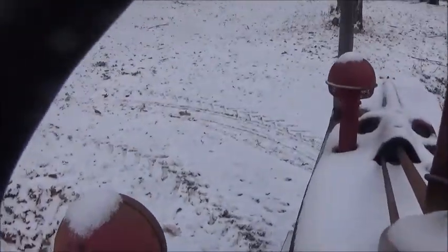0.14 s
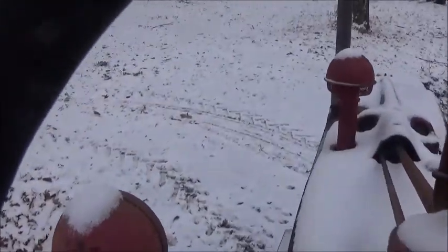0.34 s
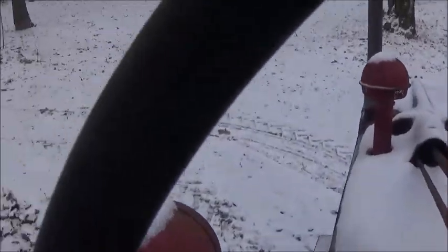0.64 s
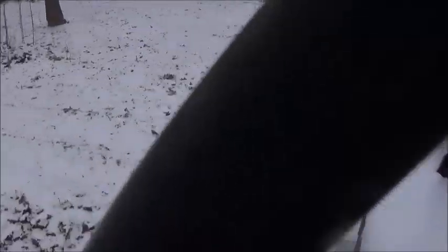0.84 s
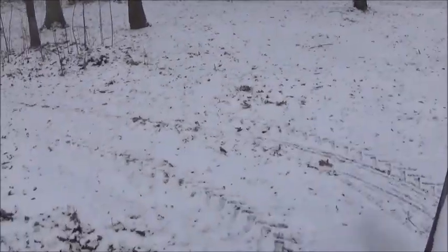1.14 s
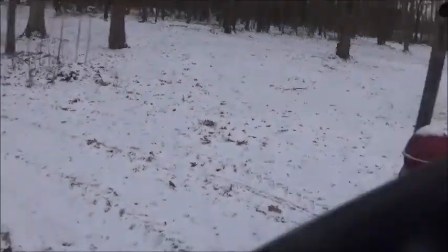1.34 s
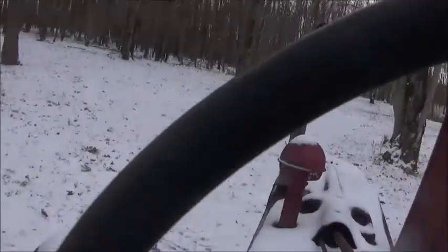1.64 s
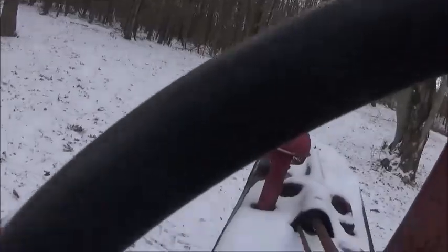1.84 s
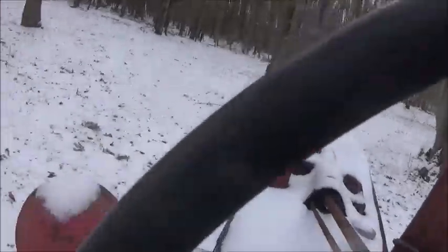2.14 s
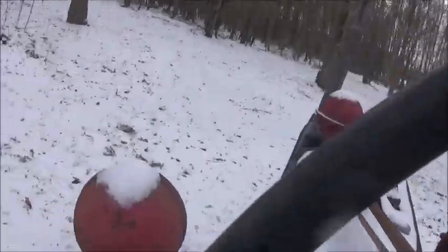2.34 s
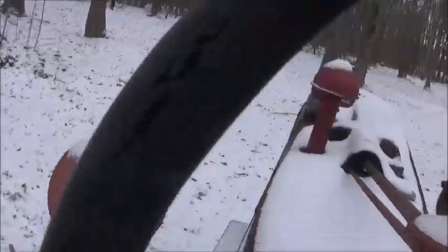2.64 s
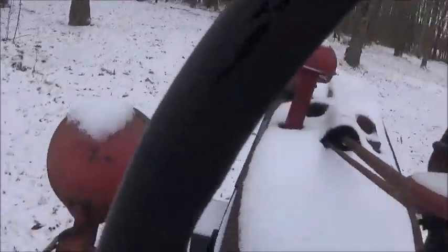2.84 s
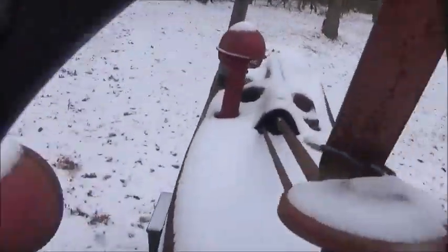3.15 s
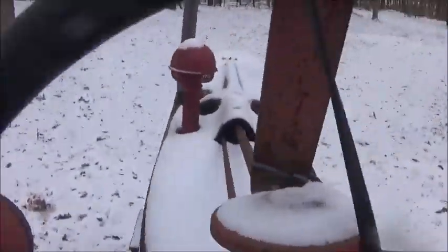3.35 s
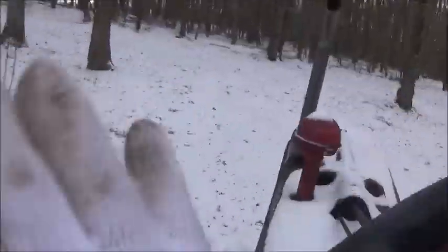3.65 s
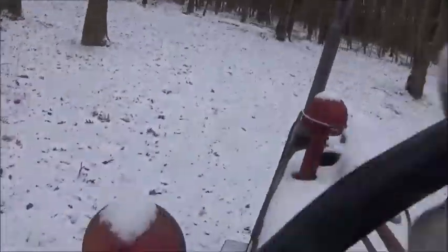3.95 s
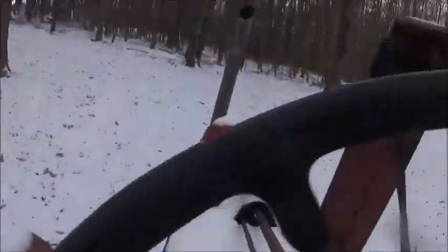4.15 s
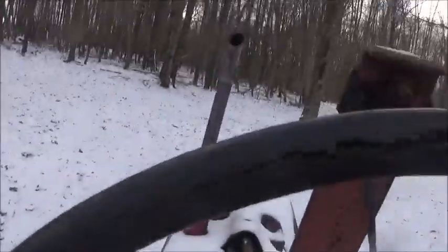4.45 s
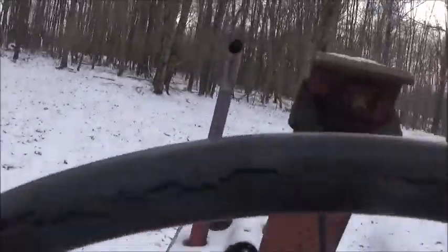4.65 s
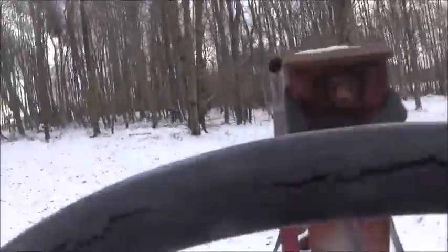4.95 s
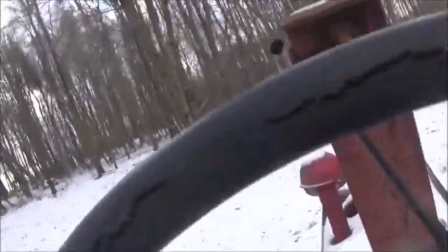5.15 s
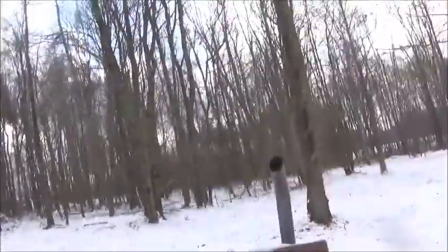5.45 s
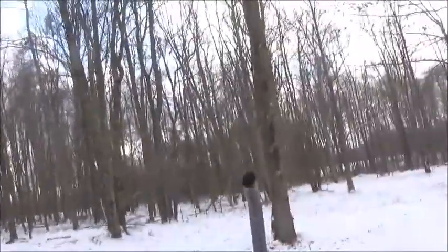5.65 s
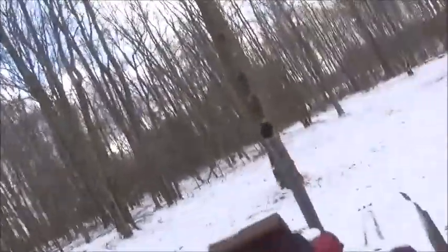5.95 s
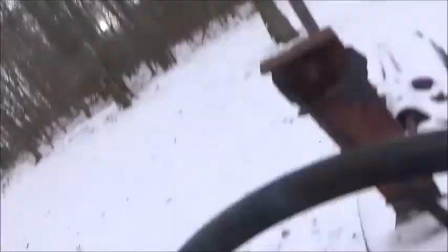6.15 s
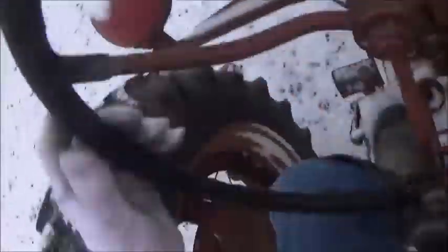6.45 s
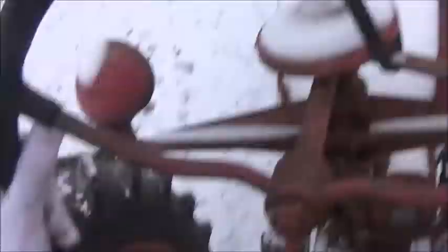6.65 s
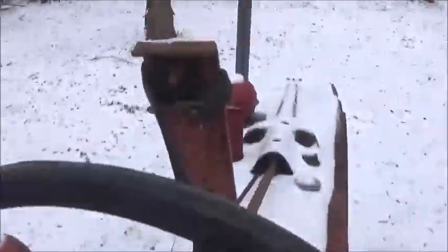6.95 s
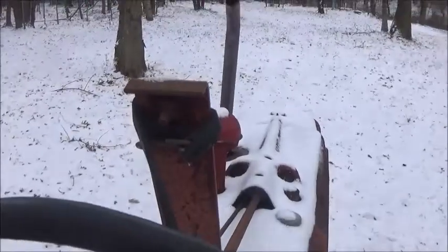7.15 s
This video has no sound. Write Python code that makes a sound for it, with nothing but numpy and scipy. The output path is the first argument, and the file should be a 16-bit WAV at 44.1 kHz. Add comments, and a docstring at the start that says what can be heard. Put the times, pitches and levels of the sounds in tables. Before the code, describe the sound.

An old four-cylinder tractor idles with an uneven, tinny chug, heard close up from the driver's seat outdoors. After about a second it is throttled up and the pulses quicken into a loud, rasping bark. The throttle shuts briefly twice, softening the exhaust, then the engine pulls at a steady speed. Underneath are a low boom, engine clatter, chassis rumble and a faint gear whine.

```python
"""A snowy field, from the seat of an old four-cylinder tractor with an open exhaust stack.
It idles, is throttled up, the governor shuts the throttle twice, then it pulls steadily.
Underneath, the chassis rumbles, a gear whines, panels chug at idle and the block clatters.
On top, each firing is a boom of the stack and a rasping jet of gas that rings pipe and bonnet."""
import sys
import numpy as np
from scipy import signal
from scipy.fft import rfft, irfft
from scipy.io import wavfile
from scipy.ndimage import uniform_filter1d

SR = 44100
rng = np.random.default_rng(int(sys.argv[2]) if len(sys.argv) > 2 else 0)


def to_wav(sig):
    """Store sig (one row per channel, or 1-D mono) as 16-bit WAV at the path in sys.argv[1].

    Samples outside -1..1 are clipped; the rate is SR.
    """
    pcm = np.clip(np.atleast_2d(sig), -1, 1) * 32767
    pcm = np.round(pcm).astype(np.int16)
    wavfile.write(sys.argv[1], SR, pcm.T)  # frames by channels


N = 321930
TIME = np.arange(N) / SR
IDLE_RATE, SMOOTH_RATE, WORK_RATE = 34, 43.5, 56.8  # firings/s: idling, smoothing out, under way


def amp(db):
    """Decibels to gain."""
    return 10 ** (np.asarray(db) / 20)


def unit_rms(x):
    """Scales to rms 1."""
    return x / np.sqrt(np.mean(x ** 2) + 1e-20)


def steadied(x):
    """Rides the gain to hold the slow level of the channels' mean at 1."""
    return x / np.sqrt(uniform_filter1d(x.mean(0) ** 2, size=6000) + 1e-12)


def curves(rows):
    """Breakpoints to one automation curve per column after the time."""
    s, *columns = np.transpose(rows)
    return [np.interp(TIME, s, c) for c in columns]


def wander(hz):
    """Random drift of rms 1, up to about hz changes a second."""
    f = np.fft.rfftfreq(N, 1 / SR)
    return unit_rms(irfft(rfft(rng.standard_normal(N)) * np.exp(-(f / hz) ** 2), N))


def panned(x, left_db):
    """Leans a sound to the left, or to the right if negative."""
    return np.array([x[0] * amp(left_db / 2), x[-1] * amp(-left_db / 2)])


def lagged(pair, radians):
    """Low sound bends round the listener and reaches the left side a little later."""
    return (signal.hilbert(pair) * np.exp(1j * radians * np.array([[-.5], [.5]]))).real


def noise_pair(correlation):
    """Stereo white noise, from wide at 0 to mono at 1."""
    a, b = rng.standard_normal((2, N))
    mid, side = np.sqrt(1 + correlation) * a, np.sqrt(1 - correlation) * b
    return np.array([mid + side, mid - side])


def band(x, lo_hz, hi_hz, order=8):
    """Band-pass whose neighbours add up to flat."""
    size = 2 ** 19
    f = np.fft.rfftfreq(size, 1 / SR) + 1
    gain = 1 / ((1 + (lo_hz / f) ** order) * (1 + (f / hi_hz) ** order))
    return irfft(rfft(x, size) * gain)[..., :N]


def coloured(x, spectrum):
    """Applies an EQ curve drawn on a log-frequency axis."""
    hz, _, z = signal.stft(x, SR, nperseg=2048)
    points_hz, points_db = np.transpose(spectrum)
    db = np.interp(np.log(hz + 1), np.log(points_hz), points_db)
    return signal.istft(z * amp(db)[:, None], SR)[1][:, :N]


def ring(x, hz, width_hz, db):
    """A resonance lifts (or hollows) the sound around its centre and rings on briefly."""
    carrier = np.exp(2j * np.pi * np.cumsum(hz * np.ones(N)) / SR)
    pole = np.exp(-np.pi * width_hz / SR)
    resonant = 2 * (carrier * signal.lfilter([1 - pole], [1, -pole], x * carrier.conj())).real
    return x + (amp(db) - 1) * resonant


def mode(hz, decay_s, length_s=0.05):
    """One struck mode: a dying sine."""
    t = np.arange(int(length_s * SR)) / SR
    return np.exp(-t / decay_s) * np.sin(2 * np.pi * hz * t)


def strikes(times, db, shape):
    """One copy of shape at each time."""
    train = np.zeros(N)
    np.add.at(train, np.clip((times * SR).astype(int), 0, N - 1), amp(db))
    return signal.oaconvolve(train, shape)[:N]


# The revs: t/s, firing rate/Hz
REVS = [(0.0, 31.38), (0.25, 32.92), (0.57, 32.16), (0.86, 35.78), (1.26, 35.63), (1.37, 40.54),
        (1.85, 53.93), (2.26, 62.62), (2.42, 61.24), (2.83, 54.18), (3.22, 61.19), (3.34, 55.8),
        (4.0, 58.31), (4.43, 57.97), (4.69, 59.17), (5.22, 56.53), (5.7, 58.6), (6.1, 59.14), (7.3, 58.82)]

def crank():
    """The crankshaft's running count of firings, one whole number per blast."""
    return np.cumsum(curves(REVS)[0]) / SR - .253


def idling():
    """1 at idle, falling to 0 as the engine picks up."""
    return np.clip((SMOOTH_RATE - curves(REVS)[0]) / (SMOOTH_RATE - IDLE_RATE), 0, 1)


# The throttle, worked by hand and governor: t/s, opening (0 shut, 1 wide open)
OPENING = [(0, 0.51), (1.24, 0.14), (1.37, 0.82), (1.75, 0.99), (2.28, 0.9), (2.37, 0.19), (2.68, 0.36),
           (2.9, .92), (3.21, 0.88), (3.27, 0), (3.4, 0.23), (3.5, 0.77), (4.5, 0.79), (5.0, 0.54),
           (5.55, 0.82), (5.85, .7), (6.3, .64), (7.3, 0.72)]
# The listener leans towards the engine and away: t/s, level/dB
LEAN = [(0, 4.5), (.35, 5), (.58, 2.5), (.93, 5.5), (1.18, 4), (1.5, -1.5), (2.6, -0.8), (4.2, -2.5),
        (4.9, 2.5), (5.25, 0.5), (5.9, -0.5), (6.52, 5), (6.72, 2.4), (7.3, 3)]

def fader(full_db, shut_loss_db, octave_db, lean_share):
    """Gain of one engine part; full_db holds at full throttle and working speed, before the lean."""
    throttle, rate, lean_db = curves(OPENING) + curves(REVS) + curves(LEAN)
    revs_db = octave_db * np.log2(rate / WORK_RATE)
    return amp(full_db - shut_loss_db * (1 - throttle) + revs_db + lean_share * lean_db)


# Each cylinder's accent, in firing order: rasp/dB, sizzle/dB, lateness/s
ACCENTS = [(1, 7, 0.0011), (3.5, 4, 0.0013), (0.4, 6.5, 0.00163), (4, 4, 0.00092)]

def firings(count):
    """For every opening of an exhaust valve: time, the cylinder's rasp and sizzle, and chance strength."""
    at = np.flatnonzero(np.diff(np.floor(count)) > 0)
    cylinder = (np.round(count[at]).astype(int) + 1) % len(ACCENTS)
    jitter, luck = rng.standard_normal((len(at), 2)).T
    rasp_db, sizzle_db, late_s = np.array(ACCENTS)[cylinder].T
    opens = at / SR - .0046  # the valve opens ahead of the blast's peak
    return opens + late_s + 0.00025 * jitter, rasp_db, sizzle_db, luck


# Fader of the low bed: level/dB, loss with throttle shut/dB, gain per octave of revs/dB, share of lean
CHASSIS_FADER = (-36.5, 0.4, -1.5, 1.5)

def chassis_rumble():
    """The chassis shakes, most of all at idle."""
    shake = unit_rms(band(noise_pair(0.18), 67, 253, order=4))
    return panned(shake * fader(*CHASSIS_FADER), -4.0)


# Fader shared by gears, panels and block: columns as CHASSIS_FADER
METAL_FADER = (-30, 0.3, 0.5, 1.0)
# Partials of the whine: multiple of the firing rate, relative level/dB
GEAR_PARTIALS = [(2.905, -10.5), (5.81, -6), (5.03, -15), (4.5, -17), (11.62, -19)]

def gear_whine(count):
    """Whine of the drive, locked to the engine speed; it stands out when the throttle shuts."""
    whine = sum(amp(db + 1.1 * wander(4.3)) * np.cos(2 * np.pi * multiple * count + 0.23 * wander(7.7))
                for multiple, db in GEAR_PARTIALS)
    mesh_db = 3.2 - 6 * curves(OPENING)[0] - 11 * idling()
    return panned([np.sqrt(2) * whine * fader(*METAL_FADER) * amp(mesh_db)], -2.0)


# Ringing sheet metal: f/Hz, relative level/dB, decay/s
PANEL_MODES = [(264.5, -3, 0.021), (356, 0, 0.017), (468, -6.5, 0.015), (648, -2, 0.021),
               (850, -0.5, 0.011)]

def panel_chug(count):
    """At idle every firing shakes the sheet metal into a low chug."""
    times, _, _, luck = firings(count)
    chug = sum(amp(db) * mode(hz, decay_s, length_s=0.1) for hz, db, decay_s in PANEL_MODES)
    shaken = steadied(strikes(times, 2.8 * luck, chug)[None])
    return panned(shaken * amp(-5.5) * idling() * fader(*METAL_FADER), -4.0)


# EQ of the block's rattle, ahead of its band-pass: f/Hz, level/dB
RATTLE_EQ = [(120, -33), (200, -30), (215, -6.5), (284, -8.5), (339, -2), (461, -11.5), (682, -6.5),
             (815, -9.5), (1040, 5.5), (1100, 1), (1430, -39), (2420, -120)]

def block_clatter(count):
    """The block rattles all the time, thumps as each valve opens and knocks between firings."""
    times, rasp_db, _, luck = firings(count)
    rattle = band(coloured(noise_pair(0.75), RATTLE_EQ), 134, 838)
    rattle = lagged(steadied(rattle), radians=0.41)
    pop = mode(270, decay_s=0.002) + 1.1 * mode(690, decay_s=0.0038)
    thump = unit_rms(strikes(times, 2 * rasp_db + 3.2 * luck, pop))
    thump_db = -10 + 8.9 * curves(OPENING)[0] ** 4  # a full charge thumps hardest
    tap = mode(235, decay_s=0.0035) + 0.91 * mode(1050, decay_s=0.0012)
    knock = unit_rms(strikes(times + .0135, 3 * rng.standard_normal(len(times)), -tap))
    knock_db = -13 + 8 * idling()
    clatter = amp(-2.0) * rattle + amp(thump_db) * thump + amp(knock_db) * knock
    return panned(clatter * fader(*METAL_FADER), -2.5)


# Faders of the boom, harmonics 1 to 4 of the firing rate: columns as CHASSIS_FADER
BOOM_FADERS = [(-33, 11.5, 14, 0.78), (-28, 0.5, 0.5, 0.89), (-34.5, -1.5, 5.5, 1),
               (-44.5, -1.8, -13.5, 0.28)]

def stack_boom(count):
    """Low harmonics of the exhaust pulses; the stack shifts each in phase by its frequency."""
    rate = curves(REVS)[0]
    boom = np.zeros(N)
    for k, setting in enumerate(BOOM_FADERS, 1):
        phase = 2 * np.pi * k * (count + .0036 * rate) - 4.6 * np.log(k * rate / 118)
        boom += fader(*setting) * amp(0.33 * wander(10)) * np.sqrt(2) * np.cos(phase)
    return panned([boom], -3.3)


# Peaks and hollows of stack and bonnet: f/Hz, width/Hz, level at idle/dB, level with hot gas under way/dB
STACK_MODES = [(1213, 99, 7.5, -2), (1840, 240, 8, 2), (2530, 140, 9, 0), (3530, 350, -5, 0.2),
               (4250, 280, -3, 1.5), (6070, 350, 11.5, -0.2), (6530, 310, -3, 3), (7760, 690, 6.5, 0)]
# The stack briefly rings or hollows at one pitch: t/s of the height, spread/s, f/Hz, level/dB
PASSING_RINGS = [(.25, 0.86, 1320, 2), (2.45, .14, 2550, 12), (2.702, 0.61, 1400, 6.5),
                 (3.32, 0.11, 1900, 10), (3.636, .25, 2280, 6), (4.7, .5, 1920, 5.5), (4.95, .6, 1080, 3.5),
                 (5.2, 1.3, 4270, 3.5), (5.25, .3, 2480, 8.5), (5.6, 0.68, 1505, 12), (5.7, 0.43, 2600, -8),
                 (6.55, 0.61, 2620, 8.5), (6.55, .5, 3980, -6)]
# The stack's tinny main ring, which glides and stands out when the throttle eases: t/s, f/Hz, level/dB
TINNY_RING = [(0, 3150, -3), (1.0, 3450, 0), (1.33, 3770, 3.5), (2.3, 3220, -1), (2.64, 3310, 10.5),
              (2.95, 3350, -3), (4.8, 3250, -1), (4.95, 3300, 6), (5.15, 3250, -1.5), (6.2, 3140, 4),
              (6.5, 3520, 11.5), (6.85, 3220, 5), (7.3, 3230, 5)]
# A reflection off the bonnet cancels one band, which moves with the head: t/s, f/Hz, level/dB
BONNET_NOTCH = [(0, 1480, 0), (1.9, 1830, -1.5), (3.1, 1660, -8), (3.8, 1400, 1), (4.4, 1370, -7),
                (5.1, 1260, -2), (5.7, 1190, -11), (6.6, 1210, -14), (7.3, 1160, -4)]

def stack_colour(gas):
    """Pipe and bonnet colour the blasts: an echo, resonances, passing rings and a moving notch."""
    idle = idling()
    round_trip_s = .0068 + 0.00012 * wander(1.3)  # part of each blast runs down the stack and back
    echo = np.array([np.interp(TIME - round_trip_s, TIME, side) for side in gas])
    gas = gas - amp(-15) * band(echo, 300, 3500, order=4)
    for hz, width_hz, idle_db, hot_db in STACK_MODES:
        gas = ring(gas, hz, width_hz, hot_db + (idle_db - hot_db) * idle)
    for s, spread_s, hz, db in PASSING_RINGS:
        gas = ring(gas, hz, width_hz=260, db=db * np.exp(-2 * ((TIME - s) / spread_s) ** 2))
    full_charge = np.interp(curves(OPENING)[0], [.75, .9], [0, 1])
    gas = ring(gas, 800, width_hz=230, db=3 * full_charge)  # throaty note when wide open
    tinny_hz, tinny_db = curves(TINNY_RING)
    gas = ring(gas, tinny_hz, width_hz=200, db=tinny_db)
    notch_hz, notch_db = curves(BONNET_NOTCH)
    return ring(gas, notch_hz, width_hz=210, db=notch_db)


def mottled(x, depth_db, patch_hz, patch_s):
    """Chance peaks and hollows come and go, so that no two blasts have quite the same colour."""
    hz, t, z = signal.stft(x, SR, nperseg=512)
    across, along = np.fft.fftfreq(len(hz), hz[1])[:, None], np.fft.fftfreq(len(t), t[1])
    blur = np.exp(-(across * patch_hz) ** 2 - (along * patch_s) ** 2)
    patches = unit_rms(np.fft.ifft2(np.fft.fft2(rng.standard_normal(blur.shape)) * blur).real)
    return signal.istft(z * amp(depth_db * patches), SR)[1][:, :N]


# EQ of the raw rush of gas: f/Hz, level/dB
GAS_EQ = [(350, -30), (600, -1), (700, 9), (950, 0.5), (1300, -2.5), (2200, -2), (3200, 0.5), (4200, -1.5),
          (5300, -7), (7700, -8.5), (9200, 1.5), (10200, -2.5), (12000, -12.5), (16000, -33.5)]

def turbulence():
    """Rushing gas; an open throttle drives a faster jet with more air at the very top."""
    rush = mottled(coloured(noise_pair(0.93), GAS_EQ), depth_db=2.5, patch_hz=199, patch_s=0.075)
    air_db = 1.9 - 7 * (1 - curves(OPENING)[0]) + 2.5 * idling() + 2.1 * wander(20)
    return rush + (amp(air_db) - 1) * band(rush, 11700, 22000, order=16)


def gas_flow(times, db, rise, fall, tail_db, tail_fall, floor_db):
    """Blast envelope: the valve opens, the cylinder empties, scatter off the tractor fills the gap."""
    # a slow crank opens the valve sooner and for longer
    stretches = (58 / np.interp(times, *np.transpose(REVS))) ** 0.88
    # an open throttle fills the cylinder, which lengthens the blast
    charges = 0.82 + 0.79 * np.interp(times, *np.transpose(OPENING)) ** 4
    starts = times - 0.0053 * (stretches - 1) - 0.0021 * (charges - 1)
    power = np.full(N, amp(2 * floor_db))
    for start, gain, stretch, charge in zip(starts, amp(2 * db), stretches, charges):
        span = slice(max(int(start * SR), 0), int(start * SR) + SR // 16)
        t = np.maximum(TIME[span] - start, 0) / stretch
        valve = 1 - np.exp(-(t / rise) ** 3)
        emptying = np.exp(-(t / (fall * charge)) ** 2)
        scatter = amp(2 * tail_db) * np.exp(-t / tail_fall)
        power[span] += gain * valve ** 2 * (emptying + scatter)
    return unit_rms(np.sqrt(power))


# Faders of the exhaust's bark, rasp, hiss and sizzle: columns as CHASSIS_FADER
JET_FADERS = [(-26.5, 4.9, -3, 0.62), (-20, 6.3, 3, 0.6), (-21.0, 18.4, -2.2, -0.011),
              (-19, 13.6, 7.5, 0.17)]
# The sizzle above 8 kHz swells and sinks: t/s, level/dB
SIZZLE_RIDE = [(0.0, 5.5), (0.25, 7), (0.8, -1.5), (1.15, -2.5), (1.55, 3.5), (2.3, -7), (2.9, -4),
               (3.2, 1.5), (3.8, -1), (5.2, 0.3), (5.55, 4), (6.55, -3.5), (7.0, -0.3), (7.3, -0.5)]
# The jet shifts sideways as the listener turns: t/s, left over right/dB
JET_PAN = [(0.0, -2), (0.59, -4), (1.24, -5.5), (1.52, -2), (2.54, -4.5), (3.39, 0.5), (3.66, -4.0),
           (4.15, 0.0), (6.14, -1.0), (6.46, 2.0), (6.57, 0), (7.3, -0.5)]

def exhaust_jet(count):
    """Each blast is a burst of turbulence that rings the stack; the treble dies first."""
    times, rasp_db, sizzle_db, luck = firings(count)
    unevenness = 1.03 + 0.65 * np.interp(times, TIME, idling())  # idle fires unevenly
    ragged = unevenness * rng.standard_normal((len(times), 4)).T
    bands_hz = [(760, 2000), (2000, 4500), (4500, 8000), (8000, 20000)]  # bark, rasp, hiss, sizzle
    flows = [gas_flow(times, rasp_db + .5 * luck + ragged[0],
                      rise=0.0017, fall=0.0056, tail_db=-23, tail_fall=0.0062, floor_db=-7.5),
             gas_flow(times, rasp_db + .5 * luck + 1.14 * ragged[1],
                      rise=0.0015, fall=0.0051, tail_db=-13.5, tail_fall=0.0059, floor_db=-16.5),
             gas_flow(times, (rasp_db + sizzle_db) / 2 + .5 * luck + 1.9 * ragged[2],
                      rise=0.0023, fall=0.0038, tail_db=-17, tail_fall=0.0072, floor_db=-22),
             gas_flow(times, sizzle_db + .5 * luck + 1.1 * ragged[3],
                      rise=0.0022, fall=0.0042, tail_db=-22.5, tail_fall=0.0047, floor_db=-20)]
    rush = turbulence()
    gas = stack_colour(sum(band(rush, *edges) * flow for edges, flow in zip(bands_hz, flows)))
    bark, rasp, hiss, sizzle = [
        steadied(band(gas, *edges, order=16)) * fader(*setting) * amp(0.83 * wander(3.7))
        for edges, setting in zip(bands_hz, JET_FADERS)]
    return panned(bark + rasp + hiss + sizzle * amp(curves(SIZZLE_RIDE)[0]), curves(JET_PAN)[0])


def scene():
    """All parts follow the one crankshaft."""
    count = crank()
    bite = exhaust_jet(count) + block_clatter(count)
    body = stack_boom(count) + panel_chug(count) + gear_whine(count) + chassis_rumble()
    return bite + lagged(body, radians=0.47)


def record(dry):
    """A soft clip rounds the loudest peaks; a steep low-pass trims the very top."""
    rounded = dry / (1 + (abs(dry) / .98) ** 6) ** (1 / 6)
    lowpass = signal.firwin(511, 15900, window=("kaiser", 9), fs=SR)
    return signal.oaconvolve(rounded, lowpass[None], "same")


dry = scene()
out = record(dry)
to_wav(out)
```